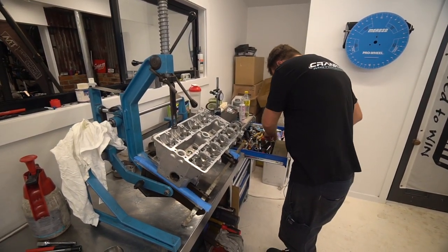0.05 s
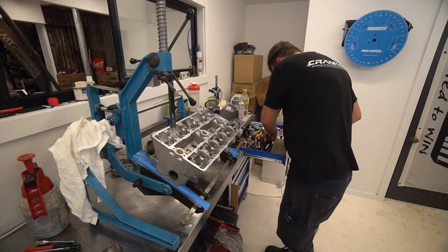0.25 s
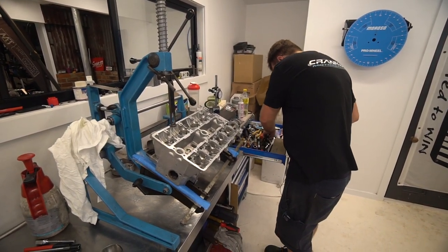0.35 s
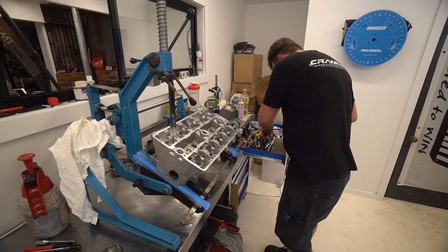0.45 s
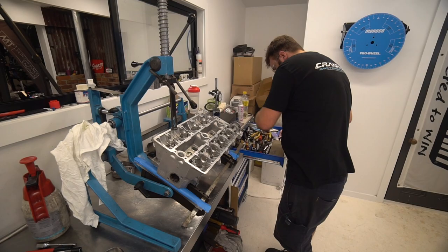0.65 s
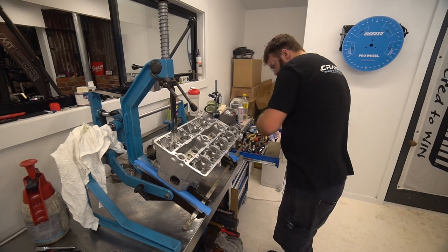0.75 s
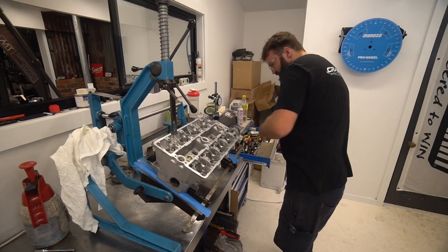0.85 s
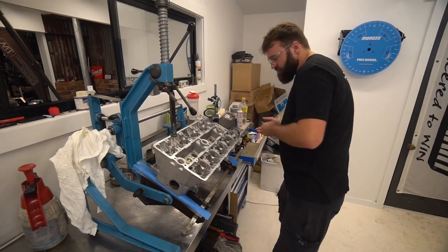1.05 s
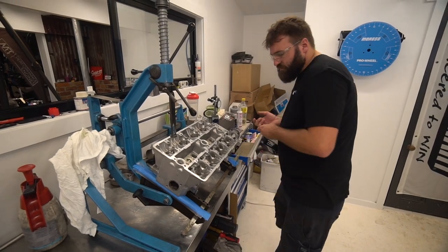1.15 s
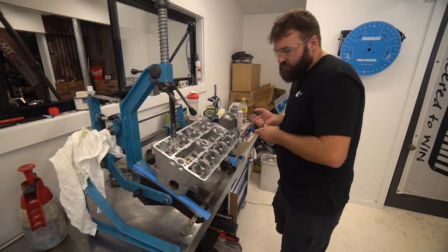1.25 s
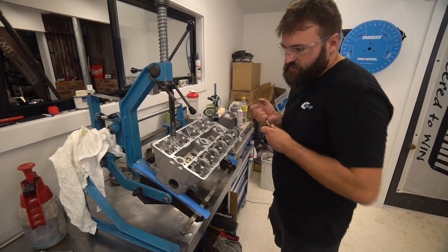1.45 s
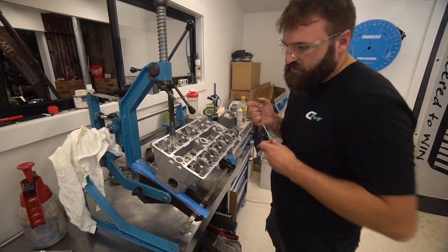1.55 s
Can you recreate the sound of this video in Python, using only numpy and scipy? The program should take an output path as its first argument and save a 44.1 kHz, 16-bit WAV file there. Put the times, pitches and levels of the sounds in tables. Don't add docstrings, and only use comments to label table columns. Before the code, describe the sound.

A hand rummages through metal tools: a light tick, a dense burst of clanks and scraping, one more knock, then scattered small clicks and sleeve rustle, in a lively room with a low steady hum.

```python
import sys
import numpy as np
from scipy import signal
from scipy.io import wavfile
from scipy.ndimage import uniform_filter1d

SR = 44100
rng = np.random.default_rng(int(sys.argv[2]) if len(sys.argv) > 2 else 0)


def waveform_to_disk(signal):
    frames = np.transpose(np.atleast_2d(signal))
    scaled = np.clip(frames, -1, 1) * 32767
    samples = np.round(scaled).astype(np.int16)
    wavfile.write(sys.argv[1], SR, samples)


def ratio(d):
    e = np.asarray(d, float) / 20
    return 10 ** e


N = 70560


def evened(x):
    return x / np.sqrt(np.mean(x ** 2) + 1e-20)


def read(points, hz):
    f, value = np.transpose(points)
    return np.interp(np.log(hz + 1), np.log(f + 1), value)


def curve(points):
    s, db = np.transpose(points)
    return ratio(np.interp(np.arange(N) / SR, s, db))


def band(x, lo_hz, hi_hz):
    sos = signal.butter(2, [lo_hz, min(hi_hz, SR * .49)], "bandpass", fs=SR, output="sos")
    return evened(signal.sosfilt(sos, x))


def add(mix, s, sound):
    part = mix[round(s * SR):][:len(sound)]
    part += sound[:len(part)]


def noise(spectrum, patchy_db, flicker_db):
    frames, hz = N // 128 + 5, np.fft.rfftfreq(512, 1 / SR)
    real, imaginary, patches = rng.standard_normal((frames, 257, 3)).T
    patches = evened(uniform_filter1d(uniform_filter1d(patches, 6, 0), 20, 1))
    flicker = evened(uniform_filter1d(rng.standard_normal(frames), 6))
    level_db = read(spectrum, hz)[:, None] + patchy_db * patches + flicker_db * flicker
    z = (real + 1j * imaginary) * ratio(level_db)
    return evened(signal.istft(z, nperseg=512, noverlap=384)[1][:N])


def room_hum():
    # pitch_hz, level_db
    hum_spectrum = [(20, -14.5), (90, -9), (170, -14.5), (330, -6.5), (1200, -4.5), (3000, -14),
                    (6000, -26), (16000, -38)]
    drone_hz, half_width_hz, waver_db = 264.5, 9, 5
    hum = ratio(-38.5) * noise(hum_spectrum, patchy_db=1.5, flicker_db=-0.1)
    drone = ratio(-54) * band(rng.standard_normal(N), drone_hz - half_width_hz, drone_hz + half_width_hz)
    waver = ratio(waver_db * band(rng.standard_normal(N), 1.5, 9.1))
    return hum + drone * waver


def draught():
    # start_s, level_db
    flow = [
        (0, -50),
        (.25, -51),
        (.6, -67),
        (1.2, -53.5),
        (1.5, -45),
        (1.6, -43),
    ]
    return curve(flow) * band(rng.standard_normal(N), 12, 64)


def sleeve_rustle():
    # start_s, level_db
    effort = [
        (0, -70),
        (.8, -54),
        (1.0, -52.5),
        (1.2, -52.5),
        (1.38, -55),
        (1.46, -50),
        (1.5, -47),
        (1.56, -42.5),
        (1.6, -47),
    ]
    # pitch_hz, density_db_per_hz
    cloth = [(500, -6), (1500, 1.5), (4000, -6), (7000, -8.5), (16000, -16)]
    return curve(effort) * noise(cloth, patchy_db=2.0, flicker_db=1.0)


def sliding():
    # start_s, level_db
    effort = [
        (0, -90),
        (.19, -55),
        (.215, -28),
        (.3, -38.5),
        (.45, -38),
        (.58, -61),
        (.64, -44),
        (.75, -51),
        (.9, -78),
    ]
    # pitch_hz, density_db_per_hz
    tray = [(500, -2), (1500, 0), (4000, -18), (7000, -8), (16000, -31)]
    return curve(effort) * noise(tray, patchy_db=1.5, flicker_db=1.0)


def room(x):
    # pitch_hz, t60_s
    decay = [(200, 0.57), (1000, 0.29), (4000, 0.36), (12000, 0.64)]
    wall_dull_db = 4
    taps, at = np.zeros(SR), np.arange(200, SR - 20, 20)
    taps[at + rng.integers(0, 20, len(at))] = rng.choice([-1., 1.], len(at))
    hz, t, z = signal.stft(taps, SR, nperseg=256)
    hz = hz[:, None]
    loss_db = -60 * t / read(decay, hz) - wall_dull_db * hz / 9500.0
    tail = signal.istft(z * ratio(loss_db), SR, nperseg=256)[1]
    return signal.fftconvolve(x, tail / np.linalg.norm(tail))[:N]


def thump(db, hz, t60):
    t = np.arange(8000) / SR
    rattle = band(rng.standard_normal(len(t)), 0.59 * hz, 1.97 * hz)
    tone = np.sin(2 * np.pi * hz * t) + 0.19 * rattle
    rise = np.minimum(t / 0.002, 1)
    return ratio(db - 60 * t / max(t60, .01)) * rise * tone


def ring(hz, db, t60):
    chatter, chatter_s = .33, .009
    t = np.arange(SR // 2) / SR
    a, b = uniform_filter1d(rng.standard_normal((2, len(t))), int(chatter_s * SR), axis=1)
    shake = 1 + chatter * (evened(a) + 1j * evened(b))
    tone = (shake * np.exp(2j * np.pi * (hz * t + rng.random()))).real
    return ratio(db - 60 * t / t60) * tone * np.minimum(t / 0.00066, 1)


def swarm(t, lo_hz, hi_hz, t60, hiss_share, count):
    where, phase, size, length = rng.random((4, count, 1))
    hz = lo_hz + (hi_hz - lo_hz) * where
    mode_t60 = t60 * (.5 + 0.74 * length)
    modes = ratio(10 * size - 60 * t / mode_t60) * np.sin(2 * np.pi * (hz * t + phase))
    hiss = ratio(-60 * t / t60) * band(rng.standard_normal(len(t)), lo_hz, hi_hz)
    return modes.sum(0) / np.sqrt(2 * count) + hiss_share * hiss


def crack(bright_db, body_db, top_hz=16000):
    crack_t60, snap_db, snap_t60 = 0.039, 1, 0.0033
    t = np.arange(5000) / SR
    bright = ratio(bright_db - 7.5) * swarm(t, 3973, top_hz, crack_t60, .55, count=16)
    body = ratio(body_db - 5) * swarm(t, 609, 4010, crack_t60 * 0.89, 1.183, count=12)
    snap = ratio(snap_db - 60 * t / snap_t60)
    return np.minimum(t / 0.00026, 1) * (bright + body * (1 + snap))


def ringing_parts():
    # pitch_hz, level_db, t60_s
    pin = [(5916, 0, .07), (11510, -6, .4)]
    socket = [(5900, -8, .1), (12330, -2, .07), (14060, 0, .035)]
    spanner = [(9035, 4, .07), (10220, -12, .13), (11690, -14, .15), (12490, -9, .08), (14030, -4, .05),
               (14490, -6, .07)]
    driver = [(3320, -2, .05), (5464, -12, .15), (6900, -4, .05), (7995, -6, .13), (8380, -5, .07),
              (10137, -10, .45), (10828, -11, .4), (11690, -11, .2), (12627, -9, .13), (13122, -1, .1),
              (13545, -10, .5), (13940, -9, .14), (14670, -4, .16), (15544, -10, .13)]
    bit = [(3773, -4, .12), (7303, 1, .13), (5346, -12, .2), (10133, -8, .15)]
    bolt = [(1890, -1.5, .025), (5450, -5, .12), (5540, -22.5, 0.45), (7400, -12, 0.054),
            (10200, -6, 0.054), (11920, -4.5, 0.048), (13600, -4, .04), (14200, -4, 0.069),
            (15100, -6, .05)]
    washer = [(5400, 0, .05), (7450, -7, .15), (12650, -13, .06)]
    nut = [(3270, -2, 0.036), (4200, -11, 0.053), (6220, 0, 0.079), (7260, -4, 0.036), (9820, 1, 0.052),
           (10700, -4, 0.032), (14000, -9, .02), (15500, -10, .02)]
    shim = [(8000, -4, .1), (8759, -6, .19), (10130, 0, .16), (10780, -3, .2), (13160, -6, .5),
            (14150, -12, .13)]
    parts = [pin, socket, spanner, driver, bit, bolt, washer, nut, driver, shim]
    # start_s, level_db
    strikes = [
        (0.119, -39),
        (0.203, -23),
        (0.255, -22),
        (.350, -18.5),
        (.396, -22),
        (0.595, -24),
        (0.962, -38),
        (1.166, -33),
        (.3415, -18),
        (.362, -24),
    ]
    # start_s, level_db,
    # pitch_hz, t60_s
    pings = [(.486, -27, 5650, .04), (.486, -35, 3300, .04), (.725, -41, 3800, .03), (.750, -45, 9100, .05),
             (.812, -51, 10600, .08), (.864, -43, 4900, .04), (.934, -51, 12650, .05),
             (.953, -49, 8200, .05), (1.153, -34, 4800, .035), (1.153, -33, 5450, .035),
             (1.477, -58, 15200, .1),
             (.205, -25, 6860, .03), (.205, -24.5, 8900, .03), (.2225, -29, 8900, 0.027),
                (.2225, -31, 12330, .03), (.2225, -31, 14500, .03), (.232, -27, 5200, 0.068),
                (.240, -28, 7570, .15), (.240, -32, 11690, 0.11), (.2565, -22, 14250, 0.036),
                (.268, -37, 7200, 0.043), (.296, -33.5, 9020, 0.092), (.295, -38.5, 11690, 0.22),
                (.315, -39, 12490, .15), (.375, -29, 8200, 0.068), (.405, -28, 10133, 0.15),
                (.405, -38, 13540, 0.2), (.485, -43, 10120, 0.058), (.480, -44, 7400, 0.32),
                (.608, -32, 12500, .1), (.610, -32, 9819, 0.055), (.660, -46, 13670, 0.13),
                (.670, -45, 5500, 0.045), (1.174, -43, 12300, 0.069), (1.197, -51.5, 11530, .5),
                (1.222, -50, 15200, .04)]
    rings = np.zeros(N)
    for part, (s, blow_db) in zip(parts, strikes):
        add(rings, s, ratio(blow_db) * sum(ring(*mode) for mode in part))
    for s, db, hz, t60 in pings:
        add(rings, s, ring(hz, db, t60))
    return rings


def bench_blows():
    # start_s, bright_db, body_db
    clatter = [(0.1136, -35, -26.5), (0.1156, -24, -39), (0.2042, -16, -23), (0.2091, -28, -28.5),
               (.2230, -26, -25.5), (.2290, -25, -27), (.2340, -23, -27.5), (0.2497, -11, -20),
               (0.2558, -7.5, -19.5), (.3390, -15, -22), (0.3426, -11, -16.5), (0.3485, -11, -9),
               (0.3516, -7, -16.5), (0.3603, -11.5, -22), (0.3669, -30, -21), (.3754, -31, -25.5),
               (0.395, -26, -16), (0.3995, -13, -26), (.4596, -36, -32), (0.4658, -36, -29),
               (.4740, -34, -32), (.4850, -29, -35), (.5930, -40, -24), (0.594, -14, -35.5),
               (.6060, -25, -29), (.6150, -39, -25.5)]
    # start_s, bright_db, body_db, top_hz
    ticks = [(.175, -46, -57, 14900), (.725, -53, -37, 6950), (.750, -53, -40, 8750),
             (.800, -44, -50, 14150), (.820, -46, -43.5, 15100), (0.863, -45.5, -62, 15500),
             (.912, -41, -59, 14900), (.963, -56, -55, 8250), (.975, -49.5, -36, 6980),
             (1.103, -55, -37, 6000), (1.153, -55, -43, 6700), (1.165, -40, -35, 11600),
             (1.169, -37, -26, 8000), (1.225, -58, -41, 14900)]
    # start_s, level_db, pitch_hz, t60_s
    thumps = [(0.101, -27, 204, 0.045), (.115, -30, 407, 0.094), (.201, -22, 1195, 0.051),
              (.201, -28.5, 633, 0.14), (.214, -17, 397, 0.034), (0.227, -25.5, 440, 0.065),
              (0.2480, -15.5, 1044, 0.086), (.2478, -21.5, 682, 0.093), (0.247, -23.5, 496, 0.078),
              (0.247, -18.5, 248, 0.046), (.341, -18.5, 339, 0.052), (.350, -10, 316, 0.028),
              (.361, -10, 288, 0.027), (0.388, -18.5, 427, 0.02), (.396, -30, 324, 0.063),
              (0.399, -20, 1350, 0.069), (.460, -24.5, 696, 0.048), (.461, -23.5, 322, 0.016),
              (.474, -21.5, 396, 0.058), (.592, -7, 840, 0.0097), (.594, -17, 1026, 0.032),
              (0.597, -29, 249, 0.056), (0.7943, -27.5, 344, 0.067), (0.7999, -25.5, 335, 0.034),
              (0.9422, -18.5, 316, 0.024), (1.170, -25.5, 765, 0.037)]
    blows = np.zeros(N)
    for s, *row in clatter:
        add(blows, s, crack(*row))
    for s, bright_db, *row in ticks:
        add(blows, s, crack(bright_db + 13.5, *row))
    for s, *row in thumps:
        add(blows, s, thump(*row))
    return blows


def scene():
    background = room_hum() + draught() + sleeve_rustle() + sliding()
    rings = ringing_parts()
    blows = bench_blows()
    reverberant = ratio(-8) * room(blows + .4 * rings)
    return (blows + rings + reverberant + background)[None]


def low_pass(x):
    return signal.sosfilt(signal.butter(12, 16650, fs=SR, output="sos"), x)


def record(dry):
    edge = signal.firwin(511, 15900, window=("kaiser", 9), fs=SR)
    mix = signal.oaconvolve(dry, edge[None], "same")
    return low_pass(mix)


dry = scene()
out = record(dry)
waveform_to_disk(out)
```